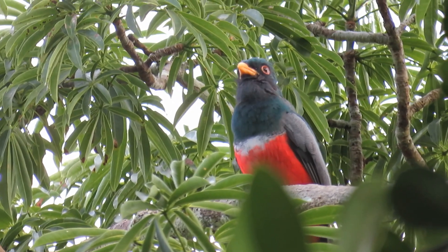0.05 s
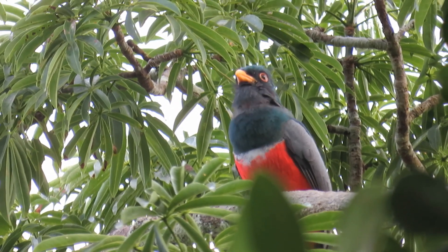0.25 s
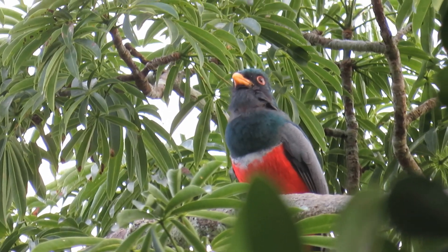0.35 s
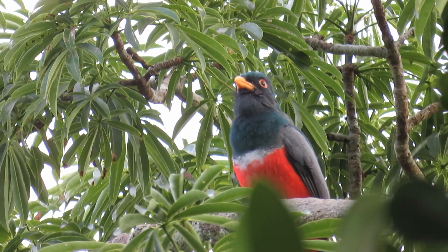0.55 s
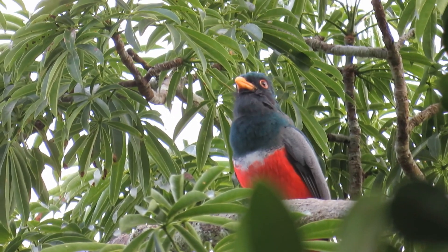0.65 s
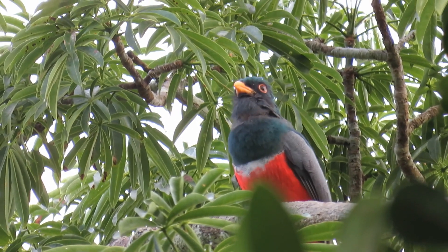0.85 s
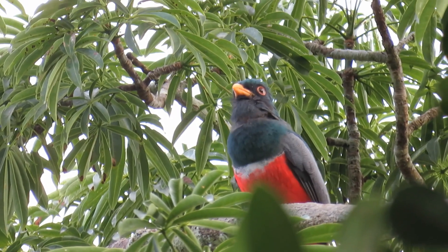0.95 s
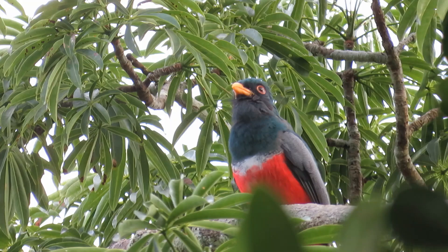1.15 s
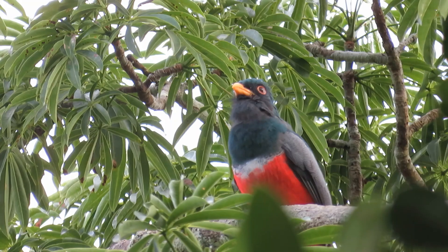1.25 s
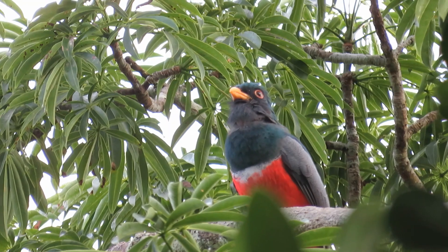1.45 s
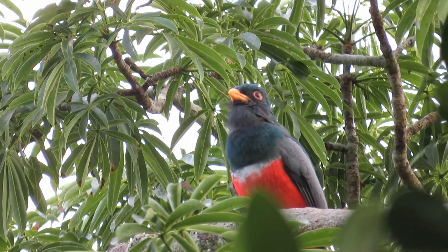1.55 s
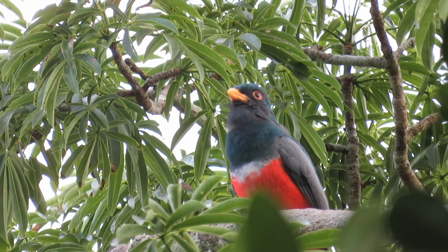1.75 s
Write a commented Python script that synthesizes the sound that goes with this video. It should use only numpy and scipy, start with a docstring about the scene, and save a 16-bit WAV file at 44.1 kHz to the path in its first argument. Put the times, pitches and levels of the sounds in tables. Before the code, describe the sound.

A trogon calls three times, each call rising then sliding down, over faint forest insects.

```python
"""Trogon in a tropical forest

A trogon calls three times from a branch: each call climbs, holds a loud pure top, then breaks into
a long reedy slide. Leaves and trunks scatter it. Behind it a cricket pulses, a small bird repeats
a rising slur, far birds whistle, insects rasp and hiss, and something knocks once on wood."""
import sys
import numpy as np
from scipy import signal
from scipy.fft import rfft, irfft
from scipy.io import wavfile
from scipy.ndimage import uniform_filter1d

SR = 44100
rng = np.random.default_rng(int(sys.argv[2]) if len(sys.argv) > 2 else 0)


def store_pcm(level_fs):
    """Save levels as 16-bit WAV."""
    pcm = np.round(np.clip(level_fs, -1, 1) * 32767).astype(np.int16)
    wavfile.write(sys.argv[1], SR, np.atleast_2d(pcm).T)


N = 79380


def undb(db):
    """Decibels to gain."""
    return 10 ** (np.asarray(db) / 20)


def unit(x):
    """Scale to rms 1."""
    return x / np.sqrt(np.mean(x ** 2) + 1e-20)


def colour(hz, points):
    """Gain at hz on an EQ curve of (frequency [Hz], gain [dB]) points."""
    f, db = np.array(points, float).T
    return undb(np.interp(np.log(np.maximum(hz, 1)), np.log(f), db))


def noise(gain):
    """Noise whose spectrum is gain(Hz)."""
    return irfft(rfft(rng.standard_normal(N)) * gain(np.arange(N // 2 + 1) * SR / N), N)


def noise_band(hz, width_hz):
    """A band of noise centred on hz, at rms 1."""
    return unit(noise(lambda f: 1 / (1 + (2 * (f - hz) / width_hz) ** 4)))


def walk(rate):
    """Smooth random motion at rms 1, with rate new values a second."""
    k = max(int(SR / rate), 1)
    steps = np.repeat(rng.standard_normal(N // k + 1), k)
    return unit(uniform_filter1d(uniform_filter1d(steps, k), k)[:N])


def cycles(hz):
    """Phase in radians of a moving frequency."""
    return 2 * np.pi * np.cumsum(hz) / SR


def swell(t, length, edge):
    """Smooth attack, hold and release; each fade takes edge seconds."""
    return np.sin(np.pi / 2 * np.clip(np.minimum(t, length - t) / edge, 0, 1)) ** 2


def scatter(x, t60, width, onset=.011):
    """Diffuse stereo reflections from vegetation, building up over onset seconds."""
    t = np.arange(N) / SR
    mid, side = rng.standard_normal((2, N)) * undb(-60 * t / t60) * swell(t, 2 * N / SR, onset)
    tails = np.array([mid + width * side, mid - width * side]) / np.sqrt(np.sum(mid ** 2))
    return signal.fftconvolve(x[None], tails, axes=1)[:, :N]


def pan(x, db):
    """Place a sound with the left channel db above the right."""
    return x * undb(np.array([[db], [-db]]) / 2)


def trogon(t):
    """A fundamental and throat-shaped overtones: clean on the held top, rough in climb and slide."""
    # the calls (top reached [s], extra hold [s], slide pitch [ratio], gain [dB])
    calls = [(0.253, 0.0044, 1.025, 0), (.807, 0.0004, 1.0, -0.34), (1.360, .009, 1.008, 0)]
    # contour of a call (time from the top [s], pitch [Hz], fundamental [dB], overtone drive [dB])
    contour = [(-.069, 380, -54, -51), (-.052, 490, -51.5, -48), (-.037, 610, -50, -44.5),
               (-.021, 810, -45.5, -48), (-.003, 945, -38, -47), (.001, 1095, -28.5, -46),
               (.005, 1146, -25.9, -43), (.027, 1136, -26.8, -45), (.044, 1105, -25.6, -52),
               (.053, 1010, -28.5, -50), (.057, 885, -39, -44.5), (.085, 845, -39.5, -44.5),
               (.112, 778, -44, -44.5), (.142, 718, -45.5, -44), (.175, 655, -48.5, -44),
               (.216, 575, -51.5, -45.5), (.227, 505, -55, -51)]
    # throat and beak colour of the overtones (frequency [Hz], gain [dB])
    throat = [(800, -8), (1150, 1), (1400, 2), (1560, -5), (1750, -8.5), (1950, -7), (2300, -11),
              (3000, -24), (4000, -30), (5300, -5), (7000, -40)]
    hold_from_s, hold_to_s, break_s, reedy_until_s = .015, .0456, .057, .19
    steady_jitter, loose_jitter, hoarseness, flutter_db = .0034, .013, .3, 2.5
    upper_db, reedy_lift_db, tilt_db_per_oct = -10.5, 6, -10  # harmonics 3 to 7
    when, pitch, fund_db, over_db = np.array(contour).T
    falling = np.interp(when, [hold_to_s, break_s], [0, 1])
    out = np.zeros(N)
    for top, extra_hold, slide, db in calls:
        at = top + when + np.interp(when, [hold_from_s, hold_to_s], [0, extra_hold])
        loose = np.interp(t, at, np.maximum(falling ** 4, when < -.002))  # 0 on the top, 1 either side
        reedy = np.interp(t, at, falling * (when < reedy_until_s))
        jitter = (steady_jitter + loose_jitter * loose) * walk(420)
        hz = np.interp(t, at, pitch * slide ** falling) * (1 + jitter)
        phase = cycles(hz)
        overtones = colour(2 * hz, throat) * np.sin(2 * phase)
        for k in range(3, 8):
            harmonic_db = upper_db + reedy_lift_db * reedy + tilt_db_per_oct * np.log2(k / 3)
            harmonic_db += flutter_db * walk(69.8)
            overtones += colour(k * hz, throat) * undb(harmonic_db) * np.sin(k * phase)
        fundamental = undb(np.interp(t, at, fund_db) + flutter_db * loose * walk(170)) * np.sin(phase)
        overtones *= undb(np.interp(t, at, over_db) + flutter_db * loose * walk(220))
        voice = (fundamental + overtones) * (1 + hoarseness * loose * walk(650))
        out += np.sqrt(2) * undb(db) * voice * swell(t - at[0], at[-1] - at[0], edge=.005)
    return out


def among_trees(x, t):
    """Direct sound, trunk echoes, close leaves and the long forest tail."""
    # slaps off nearby trunks (delay [s], gain [dB])
    echoes = [(.0275, -16.5), (.058, -26)]
    trunks = sum(undb(db) * np.interp(t - delay, t, x, left=0) for delay, db in echoes)
    leaves = undb(-22) * scatter(x, t60=.16, width=.35, onset=.022)
    forest = undb(-18.5) * scatter(x, t60=1.15, width=.16, onset=.15)
    return pan(x + trunks + leaves + forest, db=-.6)


def cricket(t):
    """Short pure chirps on one wing resonance, each sagging in level, off to the left."""
    # the chirps (start [s], level [dB])
    chirps = [(.004, -52), (.139, -53.5), (0.266, -51), (0.404, -49.5), (0.545, -50.5), (0.672, -50.5),
              (0.809, -54), (0.940, -51), (1.075, -49.5), (1.207, -50), (1.342, -50.5), (1.476, -49.5),
              (1.615, -51.5), (1.749, -51)]
    wing_hz, chirp_s, sag_db = 4530, .05, 2.5
    envelope = np.zeros(N)
    for start, db in chirps:
        age = t - start
        envelope += undb(db - sag_db * np.clip(age / chirp_s, 0, 1)) * swell(age, chirp_s, edge=.02)
    x = np.sqrt(2) * envelope * np.sin(cycles(wing_hz * (1 + .00274 * walk(150))))
    return pan(x + undb(-9) * scatter(x, t60=.62, width=.81), db=5)


def small_bird(t):
    """A soft lead-in and four raspy accents that climb and warble, blurred by distance."""
    # the rising slurs (start [s], level [dB])
    slurs = [(-.045, -48.5), (.367, -49.5), (0.797, -48.5), (1.207, -49), (1.640, -49)]
    # contour of a slur (time from its start [s], pitch [Hz], accent [dB])
    contour = [(0, 3120, -14), (.022, 3170, -10), (.03, 3220, 3), (.041, 3290, -5), (.063, 3380, 1),
               (.073, 3400, -4), (.094, 3500, 3), (.105, 3580, -5), (.115, 3340, 1), (.123, 3300, -15)]
    warble_depth_hz, warble_rate_hz, waver_hz = 215, 110, 55
    when, pitch, accent_db = np.array(contour).T
    x = np.zeros(N)
    for start, db in slurs:
        age = t - start
        warble = warble_depth_hz * np.sin(cycles(warble_rate_hz * (1 + .35 * walk(120))))
        hz = np.interp(age, when, pitch) + warble * np.clip(age / when[-1], 0, 1) + waver_hz * walk(600)
        envelope = undb(db + np.interp(age, when, accent_db)) * swell(age, when[-1], edge=.005)
        x += envelope * np.sin(cycles(hz))
    blur = undb(-3) * scatter(x, t60=.1, width=.2)
    tail = undb(.2) * scatter(x, t60=.65, width=.34)
    return undb(.5) * x + blur + tail


def far_birds(t):
    """Thin, wavering whistles with a soft trail of reverberation."""
    # the whistles (start [s], length [s], start pitch [Hz], end pitch [Hz], level [dB])
    whistles = [(-.01, .06, 1377, 1412, -48), (0.071, .11, 1496, 1501, -53),
                (0.489, 0.077, 1368, 1420, -48), (.69, .07, 1390, 1375, -54),
                (1.022, 0.06, 1385, 1410, -46), (1.085, 0.17, 1390, 1380, -52),
                (1.112, .085, 2010, 1870, -55), (0.988, 0.04, 2783, 2800, -53),
                (0.426, 0.06, 2807, 2770, -56), (1.438, 0.027, 8100, 8280, -60),
                (1.677, 0.052, 1365, 1372, -43), (1.73, 0.1, 1355, 1384, -49)]
    x = np.zeros(N)
    for start, length, from_hz, to_hz, db in whistles:
        hz = np.interp(t - start, [0, length], [from_hz, to_hz]) * (1 + .008 * walk(140))
        x += undb(db) * swell(t - start, length, edge=.01) * np.sin(cycles(hz))
    return x + undb(-7) * scatter(x, t60=.53, width=.6)


def knock(t):
    """One soft blow rings a few short wooden modes."""
    # modes of the wood (frequency [Hz], level [dB], t60 [s])
    modes = [(428, -34, 0.081), (776, -35.5, 0.038), (922, -25, 0.031)]
    strike_s, attack_s = 1.7495, .0033
    age = np.maximum(t - strike_s, 0)
    ring = sum(undb(db - 60 * age / t60) * np.sin(2 * np.pi * hz * age) for hz, db, t60 in modes)
    x = ring * np.minimum(age / attack_s, 1)
    return x + undb(-9) * scatter(x, t60=.3, width=.4)


def rasping_insect(t):
    """A high insect that rasps in bouts of quick uneven strokes."""
    # the bouts (start [s], length [s], level before the dry/wet mix [dB])
    bouts = [(0.158, 0.25, -63), (0.49, 0.16, -57.5), (0.942, 0.39, -59.5), (1.646, 0.22, -61.5)]
    strokes_per_s = 20
    envelope = sum(undb(db) * swell(t - start, length, edge=.065) for start, length, db in bouts)
    strokes = 1 + .67 * np.sin(cycles(strokes_per_s * (1 + .15 * walk(15))))
    x = envelope * strokes * noise_band(hz=6450, width_hz=380)
    return undb(-5) * x + undb(-6.5) * scatter(x, t60=.4, width=.68)


def insect_chorus():
    """Narrow bands of massed buzzing that swell at random."""
    # the bands (centre [Hz], width [Hz], level [dB], signed swell depth [dB])
    bands = [(6514, 650, -66, 2.5), (5606, 480, -66.5, -2), (3988, 98, -65.5, 2.5), (3380, 610, -83, -12),
             (4538, 120, -65.5, -0.5)]
    out = np.zeros((2, N))
    for hz, width_hz, db, swell_db in bands:
        mid, side = noise_band(hz, width_hz), noise_band(hz, width_hz)
        out += undb(db + swell_db * walk(8.1)) * np.array([mid + .5 * side, mid - .5 * side])
    return out


def forest_air():
    """The faintly flickering wash of the forest, narrow in the bass and wide above."""
    # tone of the wash (frequency [Hz], relative level [dB])
    air_tone = [(15, -60), (25, -8), (98, -2.5), (257, -3.5), (415, -2.5), (588, -10), (769, -2),
                (1210, -4.5), (1450, -5.5), (1700, -10.5), (2930, -12.5), (3260, -7.5), (4260, -16),
                (4620, -13.5), (5010, -18.5), (6540, -20.5), (7480, -22), (15000, -35.5)]
    # its stereo width (frequency [Hz], side against mid [dB])
    air_width = [(30, -44), (70, -20.5), (130, -5), (300, 1), (700, -3.5), (1300, -7), (2400, -2),
                 (4400, -9), (8000, -1.5), (14000, -2.5)]
    level_db, flicker_db = -51.5, .45
    mid = noise(lambda f: colour(f, air_tone))
    side = noise(lambda f: colour(f, air_tone) * colour(f, air_width))
    return undb(level_db + flicker_db * walk(22)) * np.array([mid + side, mid - side]) / np.std(mid)


def scene():
    """The near bird over the life of the forest."""
    t = np.arange(N) / SR
    return (among_trees(trogon(t), t) + cricket(t) + small_bird(t) + far_birds(t) + knock(t)
            + rasping_insect(t) + insect_chorus() + forest_air())


def record(dry):
    """A steep low-pass cuts the top of the treble."""
    cutoff_hz = 15100
    return signal.sosfilt(signal.ellip(10, .2, 80, cutoff_hz, fs=SR, output="sos"), dry)


dry = scene()
out = record(dry)
store_pcm(out)
```